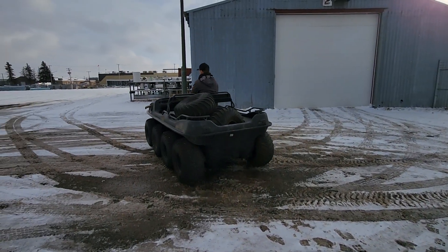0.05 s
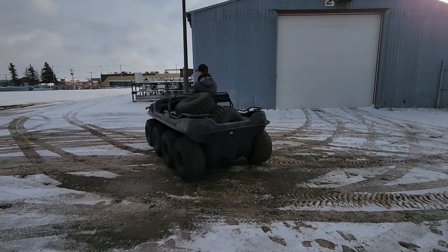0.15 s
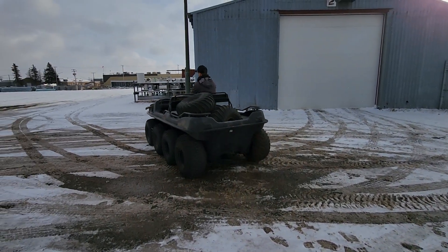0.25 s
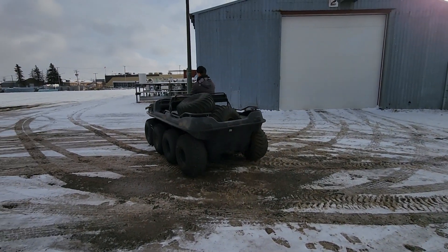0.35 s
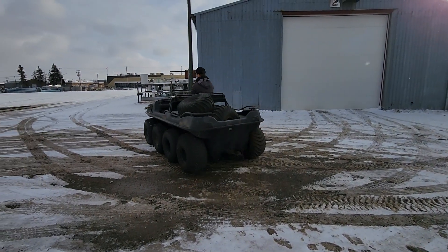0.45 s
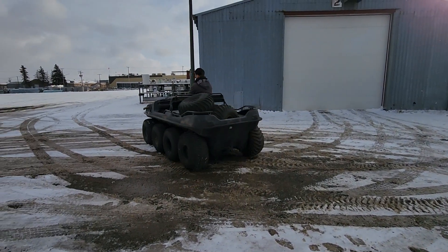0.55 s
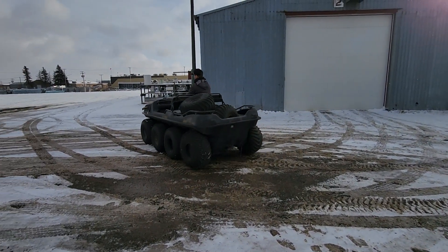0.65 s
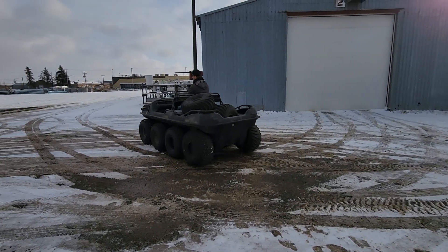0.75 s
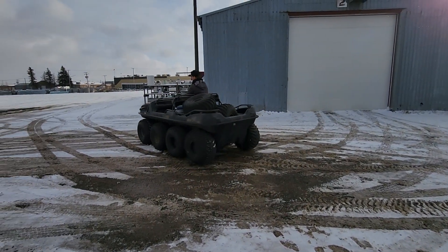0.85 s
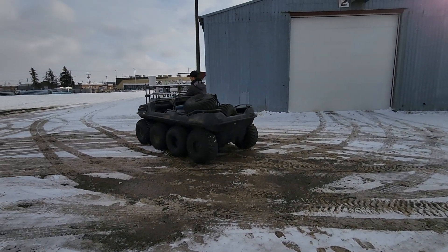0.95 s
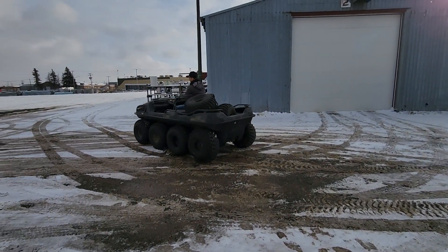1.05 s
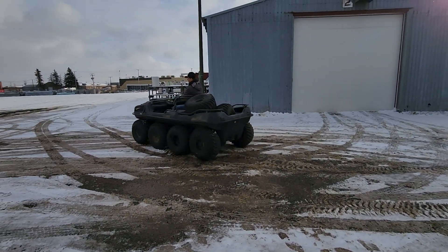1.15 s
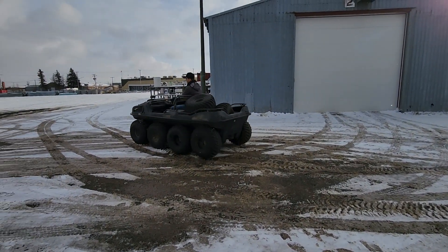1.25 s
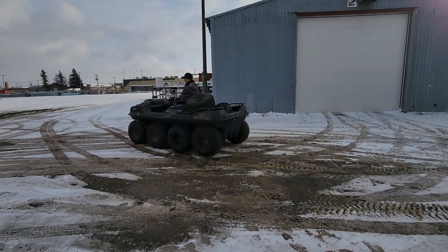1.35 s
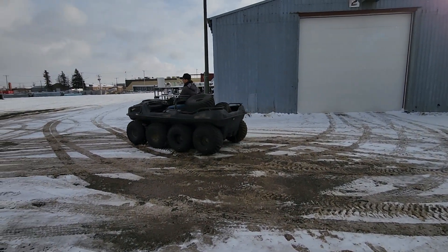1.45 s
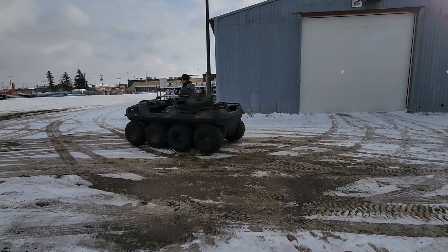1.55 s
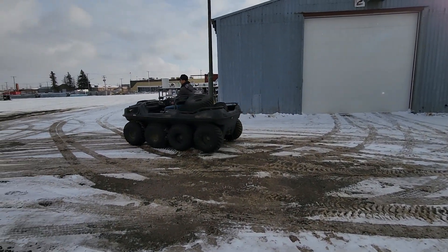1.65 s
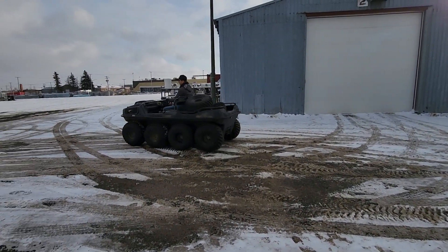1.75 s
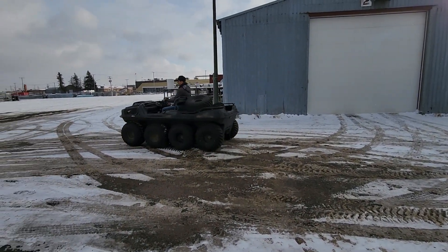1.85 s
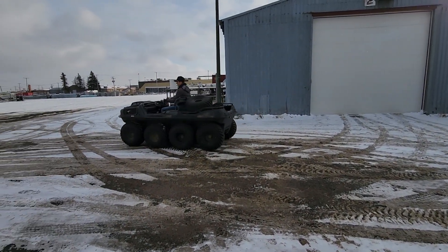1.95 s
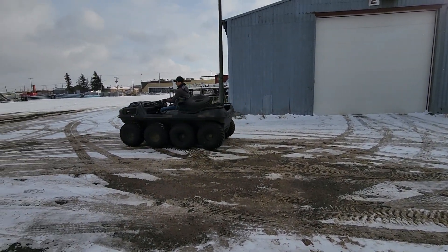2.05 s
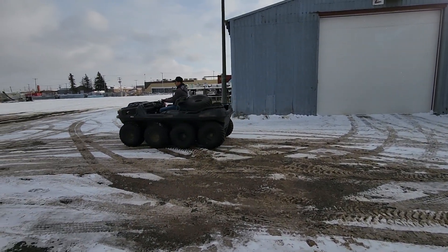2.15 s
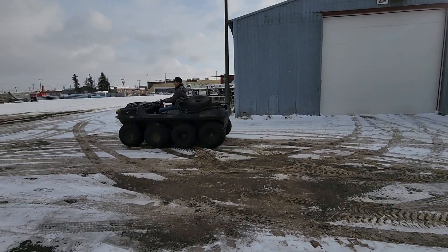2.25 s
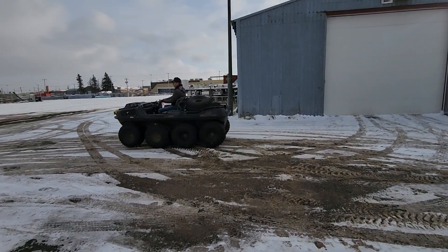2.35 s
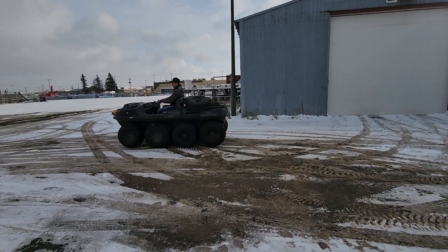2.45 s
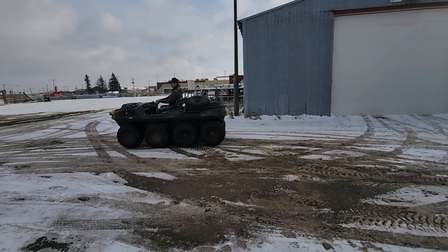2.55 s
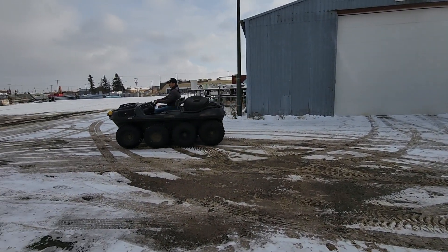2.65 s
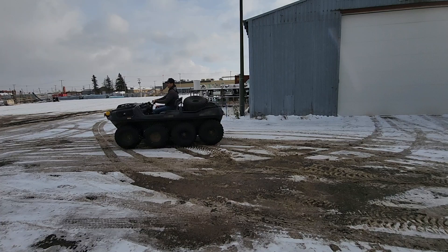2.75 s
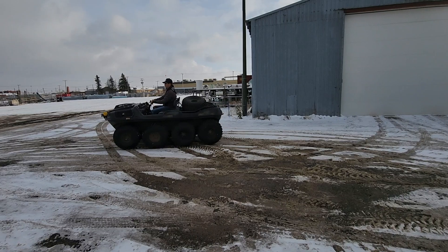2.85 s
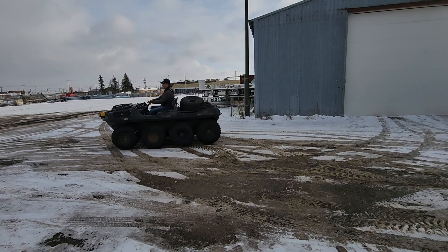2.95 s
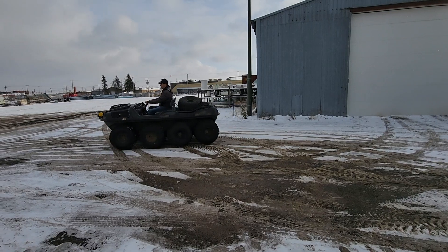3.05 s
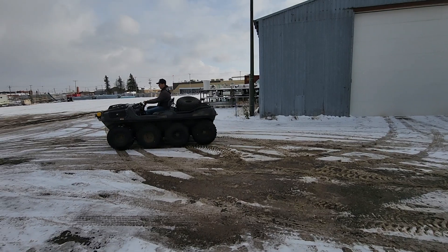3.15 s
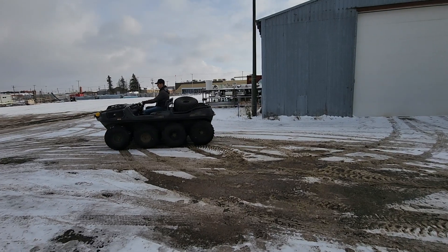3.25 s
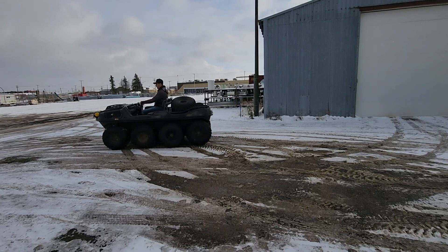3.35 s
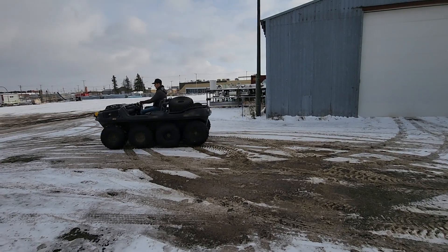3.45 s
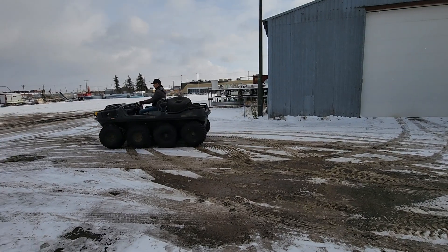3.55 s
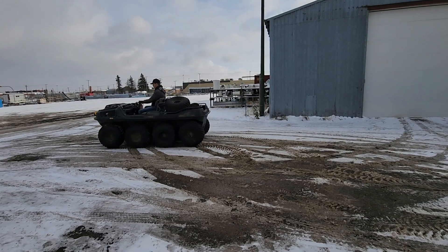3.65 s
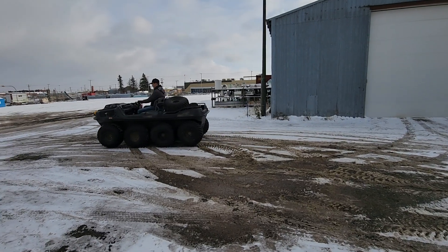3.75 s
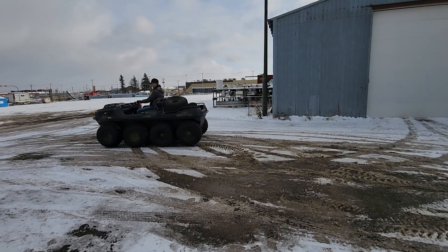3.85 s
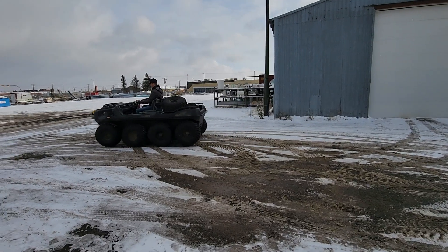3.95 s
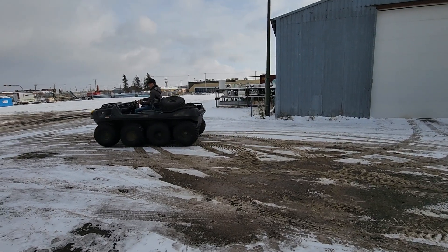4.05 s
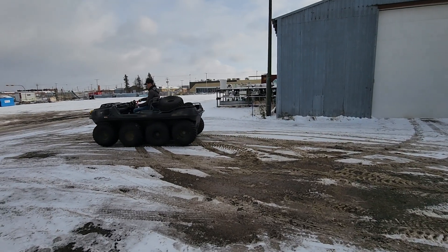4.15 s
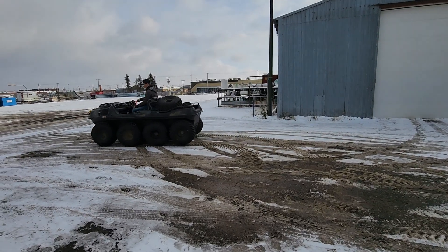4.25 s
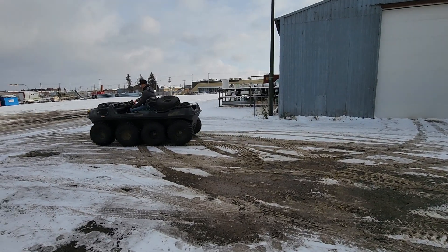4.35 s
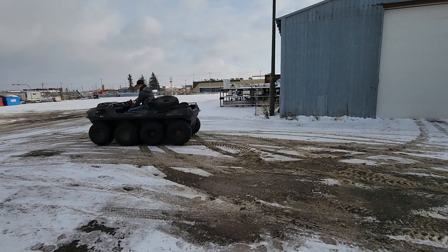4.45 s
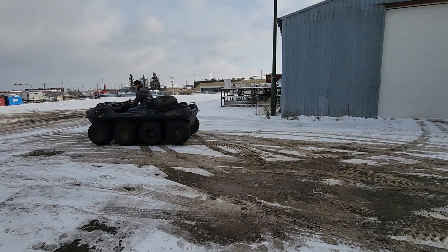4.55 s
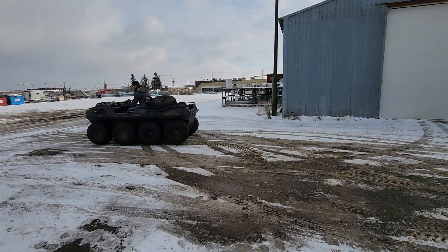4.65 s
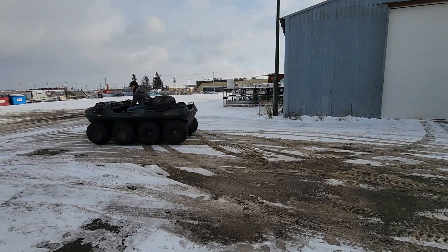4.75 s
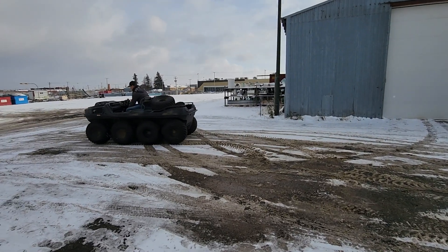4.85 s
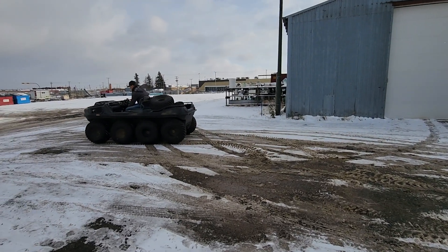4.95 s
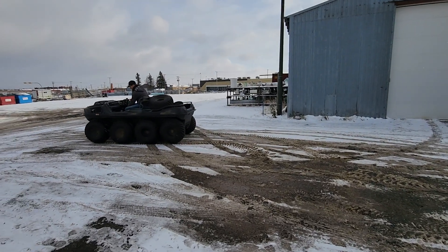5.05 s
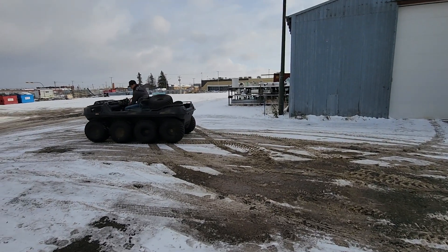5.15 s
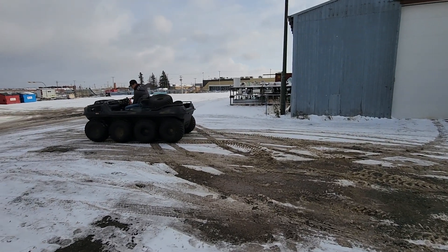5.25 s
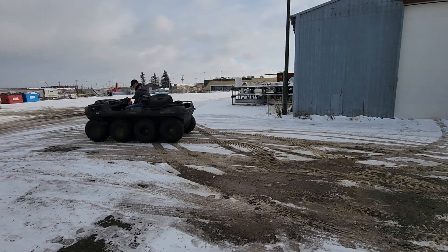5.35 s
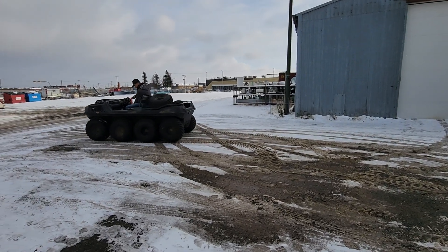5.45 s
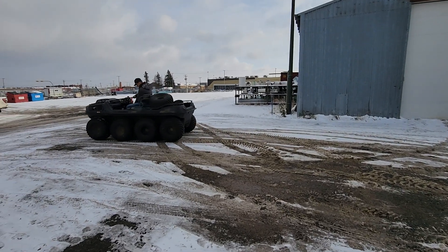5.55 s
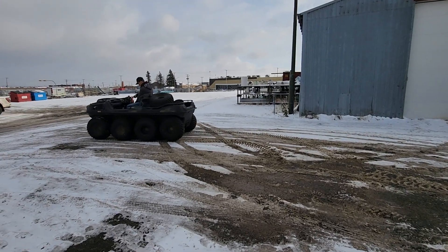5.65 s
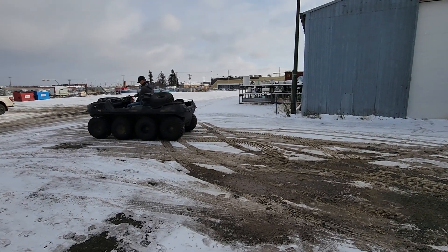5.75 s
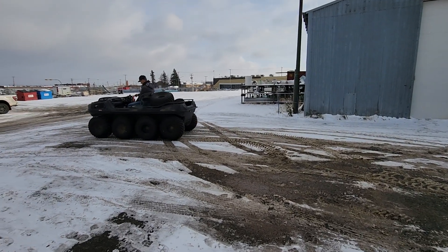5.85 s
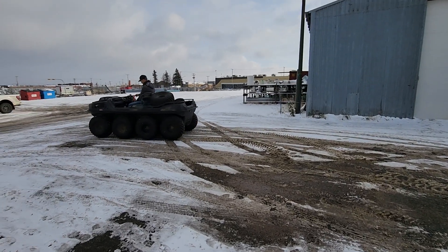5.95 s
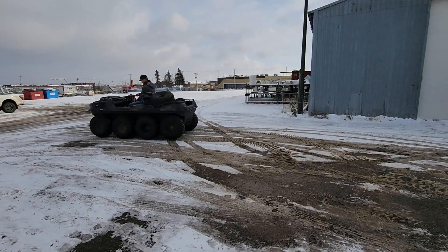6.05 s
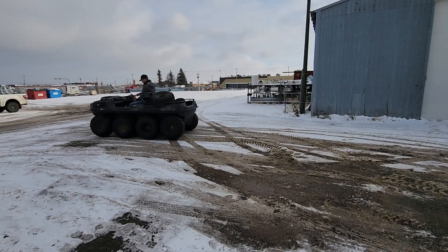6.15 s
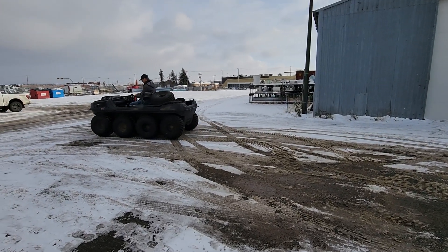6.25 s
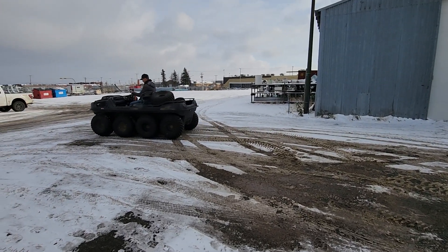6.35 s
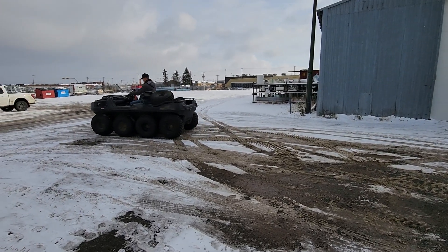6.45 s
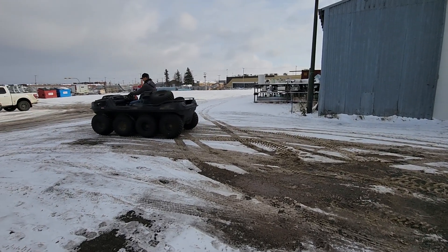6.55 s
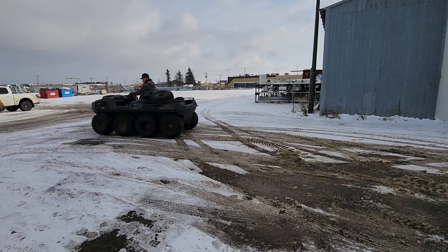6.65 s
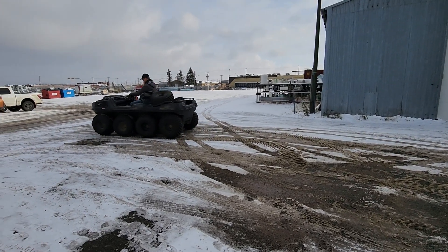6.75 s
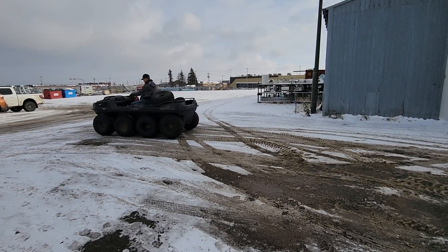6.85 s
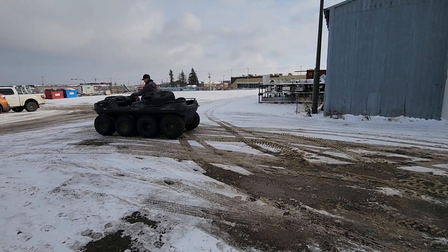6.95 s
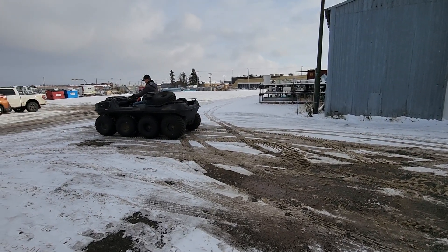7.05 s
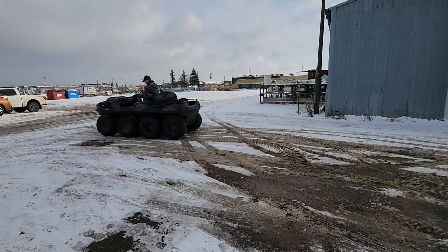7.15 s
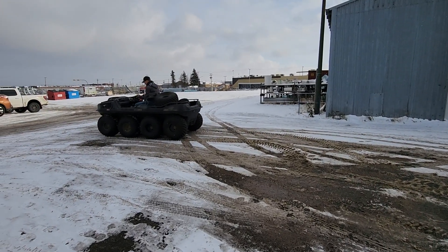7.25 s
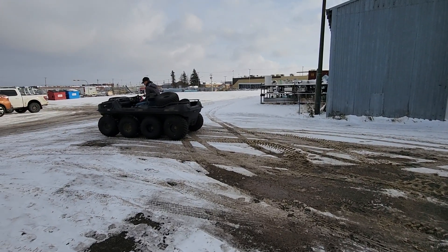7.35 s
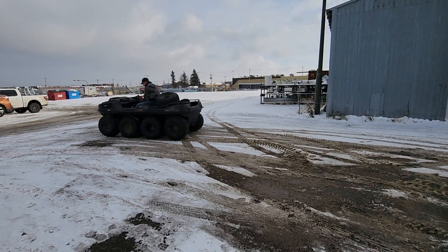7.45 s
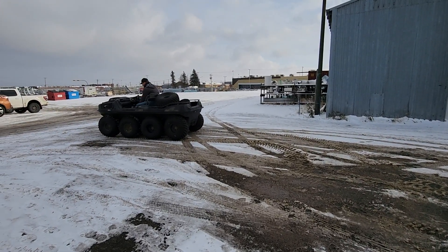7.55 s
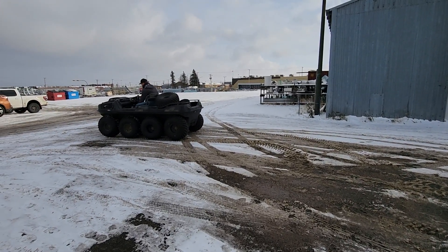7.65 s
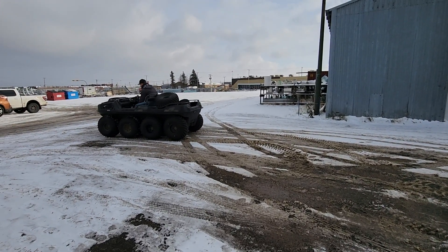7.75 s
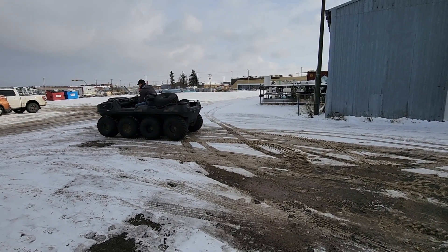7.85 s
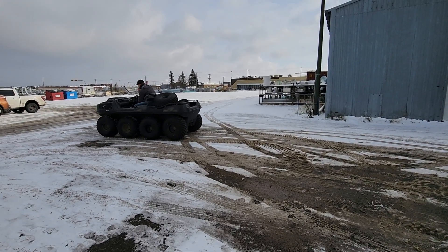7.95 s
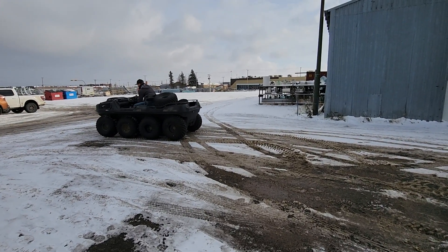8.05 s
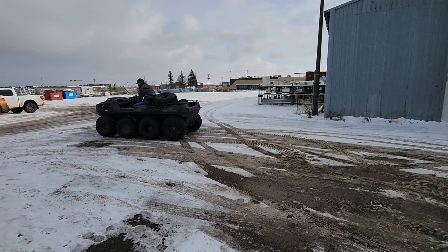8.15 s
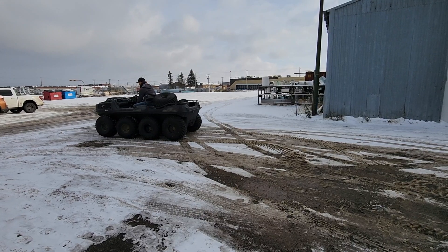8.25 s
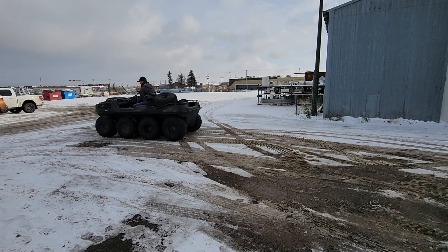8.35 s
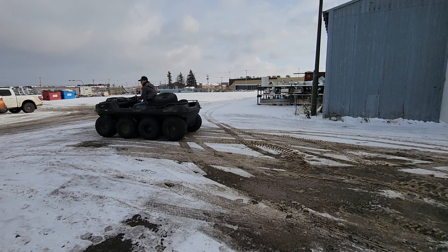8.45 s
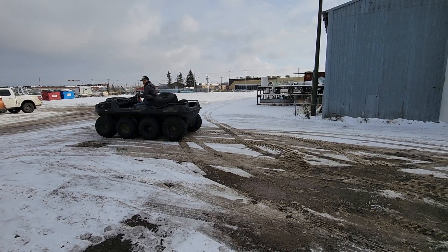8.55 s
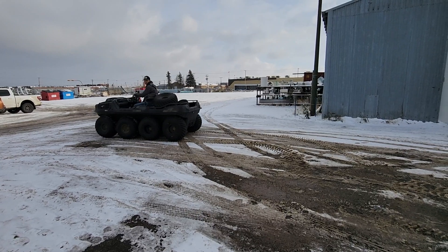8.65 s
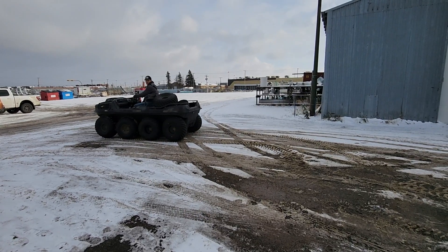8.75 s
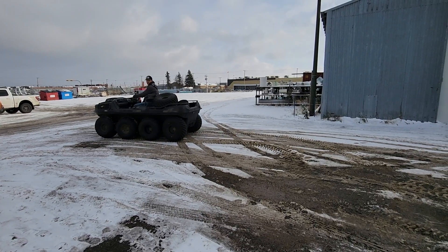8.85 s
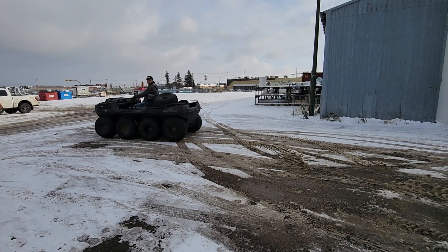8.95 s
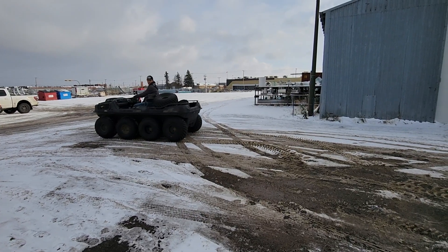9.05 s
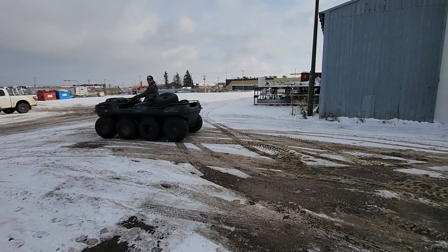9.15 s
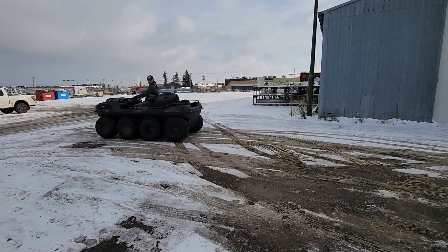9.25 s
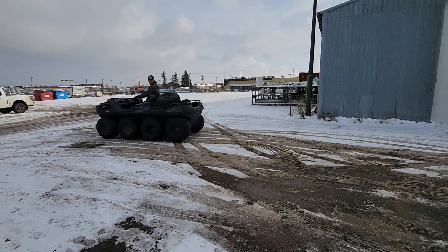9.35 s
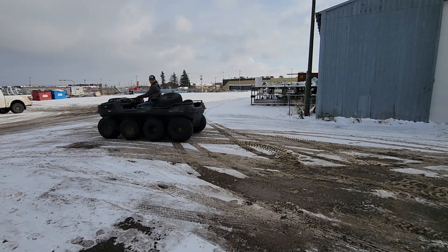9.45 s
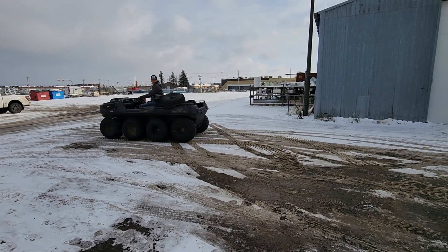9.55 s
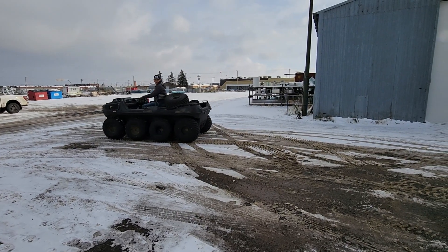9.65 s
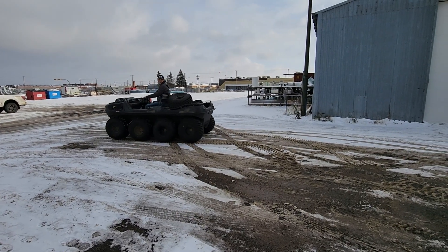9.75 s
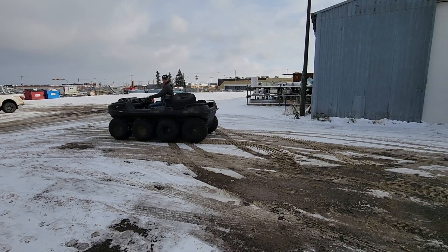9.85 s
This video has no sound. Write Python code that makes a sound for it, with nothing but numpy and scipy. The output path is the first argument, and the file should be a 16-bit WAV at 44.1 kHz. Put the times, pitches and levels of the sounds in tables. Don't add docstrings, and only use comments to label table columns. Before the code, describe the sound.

A rough engine growls at steady speed while wheels crush icy lumps, spray grit and make the hollow hull knock. A short surge, then the revs fall into a slow, lopsided chug with airy, faintly whistling puffs from the tailpipe. Crunching fades to scattered pops before a final quick rev. Open yard, faint far machine hum, handheld stereo microphone at moderate distance.

```python
import sys
import numpy as np
from scipy import signal
from scipy.fft import rfft, irfft, next_fast_len
from scipy.io import wavfile
from scipy.ndimage import uniform_filter1d, map_coordinates

SR = 44100
rng = np.random.default_rng(int(sys.argv[2]) if len(sys.argv) > 2 else 0)


def field_ratio(decibels):
    return 10 ** (np.asarray(decibels, dtype=float) / 20)


def put_to_file(sound):
    columns = np.atleast_2d(sound).T
    safe = np.clip(columns, -1, 1)
    whole_steps = np.round(safe * 32767)
    wavfile.write(sys.argv[1], SR, whole_steps.astype(np.int16))


N = 436149


def unit(x):
    return x / np.sqrt(np.mean(x ** 2) + 1e-20)


def along(points, hz):
    f, v = np.transpose(points)
    return np.interp(np.log(hz + 1), np.log(f + 1), v)


def curves(rows):
    s, *columns = np.transpose(rows)
    return [np.interp(np.arange(N) / SR, s, column) for column in columns]


def wobble(rate):
    return map_coordinates(rng.standard_normal(400), [np.arange(N) * rate / SR], mode="wrap")


def bell(s, length):
    return np.exp(-((np.arange(N) / SR - s) / length) ** 2)


def bells(rows):
    return sum(db * bell(s, length) for s, db, length in rows)


def swells(rows):
    return sum(field_ratio(db) * bell(s, length) for s, db, length in rows)


def filtered(x, response):
    m = next_fast_len(N + SR // 2)
    return irfft(rfft(x, m) * response(np.fft.rfftfreq(m, 1 / SR)), m)[..., :N]


def modes(rows, lowest=1):
    def response(f):
        total = 0
        for k, (centre, width, db) in enumerate(rows):
            sign = lowest if k == 0 else 1
            total = total + sign * field_ratio(db) * 1j * f * width / (centre ** 2 - f * f + 1j * f * width)
        return total
    return response


def noise(patchy_db):
    z = signal.stft(rng.standard_normal((2, N)), nperseg=512)[2]
    field = uniform_filter1d(rng.standard_normal(z.shape[1:]), size=5, axis=0)
    field = uniform_filter1d(field, size=6, axis=1)
    return signal.istft(z * field_ratio(patchy_db * unit(field)), nperseg=512)[1][:, :N]


# (frequency [Hz], coherence [0-1])
COHERENCE = [(60, .99), (200, .97), (380, .86), (600, .94), (1000, .75), (2000, .55), (5000, .5),
             (9000, .35), (15000, .4)]


def spread(pair, response):
    def mid_side(hz):
        turn = np.arccos(np.clip(along(COHERENCE, hz), 0, 1)) / 2
        return response(hz) * np.array([np.cos(turn), np.sin(turn)])
    mid, side = filtered(pair, mid_side)
    return unit(np.array([mid + side, mid - side]))


def steady(x, seconds):
    power = uniform_filter1d(np.mean(np.atleast_2d(x) ** 2, 0), int(seconds * SR))
    return x / np.sqrt(np.abs(power) + 1e-12)


# (time [s], pitch [Hz], level [dB])
FAR_HUM = [(0, 51.6, -35), (2.8, 51.4, -34), (3.8, 50.4, -33.5), (8.95, 50.4, -34), (9.15, 50.4, -42),
           (9.89, 50.4, -43)]
# (frequency [Hz], density [dB per Hz])
RUMBLE_SPECTRUM = [(12, -54), (25, -29.5), (40, -34.5), (60, -2), (100, 4.5), (160, -12.5), (220, -14),
                   (330, -17), (480, -32), (780, -79), (1300, -120)]
# (frequency [Hz], density [dB per Hz])
AIR_SPECTRUM = [(1470, -35), (2500, -16), (6500, 19), (8400, -53), (12400, -21), (16000, -2)]


def yard():
    hz, level_db = curves(FAR_HUM)
    level = field_ratio(level_db + 3 + 1.6 * wobble(3))
    hum = level * np.sin(2 * np.pi * np.cumsum(hz + .2 * wobble(4)) / SR)
    t = np.arange(N) / SR - 5.48
    boom = field_ratio(-25.0) * np.exp(-(t / 0.0713) ** 2) * np.sin(2 * np.pi * 75 * t)
    rumble = field_ratio(-35.5 + 1.5 * wobble(5)) * spread(noise(patchy_db=1.5), lambda f: field_ratio(along(RUMBLE_SPECTRUM, f)))
    air = field_ratio(-61.0) * spread(noise(patchy_db=1.2), lambda f: field_ratio(along(AIR_SPECTRUM, f)))
    return hum + boom + rumble + air


# (time [s], level [dB], length [s])
SLIDES = [(.7, -39, 0.1569), (4.55, -49.5, -0.3606), (5.24, -44.5, 0.0719), (6.45, -46, 0.6337)]
# (frequency [Hz], width [Hz], level [dB])
SNOW_MODES = [(5000.3, 1157, -2), (2755.4, 1638, -5)]
# (time [s], level [dB], length [s], centre [Hz], width [Hz])
GRIT = [(0.10136, -34, 0.1885, 2358.4, 619), (.8, -38.5, 0.1671, 12969, 4330),
        (0.7553, -33, 0.5154, 2447.4, 1010.7)]


def slides():
    out = swells(SLIDES) * spread(noise(patchy_db=1.5), lambda f: modes(SNOW_MODES)(f) / (1 + (f / 7500) ** 4))
    for s, db, length, centre, width in GRIT:
        spray = spread(noise(patchy_db=7.5), lambda f: modes([(centre, width, 0)])(f) ** 2)
        out = out + swells([(s, db, length)]) * spray
    return out


# (time [s], level [dB])
GROUND_SPEED = [(0, -27), (.4, -21.5), (.7, -22.5), (1.3, -23.5), (1.75, -27.5), (2.1, -26), (2.85, -24),
                (3.05, -34.5), (3.18, -25.5), (3.7, -34.5), (4.5, -40), (6.1, -39), (6.9, -46.5),
                (9.2, -46), (9.4, -36.5), (9.89, -30.5)]
# (time [s], level over the rolling [dB], length [s])
LUMPS = [(0.158, 3.5, 0.023), (0.225, -6.5, 0.0699), (.5, -1.5, 0.125), (1.03, 3, 0.0575),
         (2.13, -1, 0.062), (2.302, 8, 0.00694), (2.52, -1.5, 0.202), (4.02, 5, 0.0373),
         (4.124, 8.5, 0.02361), (4.214, 5.5, 0.02393), (4.569, 3.5, 0.0324), (4.675, 5.5, 0.01473),
         (4.772, 1.5, 0.0233), (4.909, -3, 0.0582), (5.131, 3.5, 0.04276), (6.64, 9.5, 0.02045),
         (6.831, 4.5, 0.0378), (7.943, 15, 0.01643), (8.019, 13.5, 0.03518), (8.63, 10.5, 0.0225),
         (9.328, 13, 0.06152), (9.456, 7, 0.0541)]


def rolling():
    return curves(GROUND_SPEED)[0] + 0.8312 * wobble(9) + bells(LUMPS)


# (frequency [Hz], density [dB per Hz])
CRUNCH_SPECTRUM = [(60, -16), (180, 7), (300, -1.5), (371, -5), (554, 1.5), (871, -1), (1120, -9),
                   (1350, -1), (1850, -10.5), (2200, -6.5), (2860, -20.5), (4120, -23), (5160, -24),
                   (6000, -17.5), (7800, -41.5), (13200, -120)]
# (frequency [Hz], width [Hz], level [dB])
HULL_MODES = [(465, 8.406, -6), (558.55, 42.25, 0), (655.9, 85, -3.5), (846, 29.92, -5),
              (1375.5, 53.63, -5)]


def tyres():
    level_db = rolling()
    struck = rng.random(N) < 900 / SR
    grains = struck * field_ratio(3.882 * rng.exponential(size=N)) * field_ratio(7.092 * wobble(14))
    grains = unit(np.minimum(grains, 7)) * rng.standard_normal((2, N))
    bed = spread(0.6064 * grains + noise(patchy_db=2.5),
                 lambda f: field_ratio(along(CRUNCH_SPECTRUM, f)) * (1 + modes(HULL_MODES)(f)))
    return field_ratio(level_db - 0.5) * steady(bed, 0.08976)


# (time [s], peak level [dB], centre [Hz])
SNAPS = [(0.14, -9.5, 2395), (.179, -13.5, 789.3), (.319, -19.5, 665), (.336, -12, 670), (.451, -13, 860),
         (.606, -12.5, 633.2), (.657, -11.5, 849), (.693, -19, 735.5), (.744, -13.5, 467.3),
         (.762, -15, 465), (.998, -11.5, 593), (1.1, -21, 662), (1.126, -15.5, 653), (1.224, -6.5, 690),
         (1.254, -11, 1405), (1.311, -20, 756.5), (1.35, -19, 599.3), (1.407, -13.5, 549.2),
         (1.418, -20.5, 1500), (1.497, -18.5, 529), (1.531, -27, 575.6), (1.562, -17.5, 764),
         (1.635, -14.5, 651.4), (1.686, -14, 643.1), (1.944, -17, 541), (1.98, -16.5, 645.6),
         (2.026, -16.5, 675), (2.145, -11, 698.8), (2.187, -19.5, 653.8), (2.343, -28.5, 544),
         (2.446, -25, 536.4), (2.538, -28, 600), (2.702, -20, 646.5), (2.854, -19, 837), (3.558, -12, 1254),
         (4.084, -19, 690), (6.203, -28, 699.7), (7.93, -33, 700.5), (8.009, -22.5, 922),
         (8.022, -23.5, 830.2), (8.61, -28, 890), (8.629, -30, 654), (8.854, -27.5, 600),
         (9.098, -24, 569.3), (9.349, -15.5, 678.5), (9.83, -17.5, 678)]
# (time [s], peak level [dB], centre [Hz])
CRACKS = [(5.896, -23, 1300), (5.898, -20, 1100), (5.902, -23, 1300), (5.983, -19, 1250),
          (6.001, -20, 1200), (6.0186, -17, 2800), (6.0845, -18, 1000), (6.0925, -19, 2300),
          (6.098, -10.5, 1050), (6.0985, -20, 3000)]


def snaps():
    out, t = np.zeros((2, N + SR)), np.arange(SR // 30) / SR
    for rows, cycles, ahead in ((SNAPS, 9.223, 0), (CRACKS, 2.2, 7)):
        for (s, db, hz), grain in zip(rows, rng.standard_normal((len(rows), len(t)))):
            burst = 0.523 * 0.175 * grain * field_ratio(-60 * t / 0.00342) + (t == 0)
            ring = np.sin(2 * np.pi * hz * t) * field_ratio(-60 * t * hz / cycles)
            knock = np.convolve(burst, ring)[:len(t)]
            knock = field_ratio(db) * knock / np.abs(knock).max()
            for port, way in enumerate((-1, 1)):
                out[port, round(s * SR) + way * ahead:][:len(t)] += knock
    return out[:, :N]


# (frequency [Hz], density [dB per Hz])
FAN_SPECTRUM = [(4000, -60), (7500, -10), (10000, -5), (12500, -2), (16000, 0)]


def fan(revs):
    return field_ratio(-59.5 + 8 * revs) * spread(noise(patchy_db=1.2), lambda f: field_ratio(along(FAN_SPECTRUM, f)))


# (frequency [Hz], width [Hz], level [dB])
BAY_MODES = [(306.48, 125.07, 4), (690, 54.3, 0), (858.28, 276.6, 3.5), (1266.7, 92.2, 8),
             (1522.1, 94.67, 11.5), (1646.9, 44.66, 14.5), (2208.6, 33.7, 10), (3049.5, 640.8, -2.5)]
# (time [s], level over the bay [dB], length [s])
JABS = [(9.0, -2.265, -0.7043), (9.18, -3.36, 0.0577)]
# (frequency [Hz], width [Hz], level [dB])
BRACKET_MODES = [(853, 41.48, -0.15), (1647.2, 73.53, 0.43), (319.82, 74.76, -3.444)]


def engine_bay(flow):
    shake = (1 + 0.1584 * flow.sum(0)) * field_ratio(1.0426 * wobble(25))
    panels = spread(noise(patchy_db=1.0848) * shake, lambda f: modes(BAY_MODES)(f) / (1 + (f / 6500) ** 4))
    return steady(panels, 0.738) + swells(JABS) * spread(noise(patchy_db=4.5), modes(BRACKET_MODES))


# (time [s], rate [cycles per second])
REVS = [(0, 19.14), (.89, 19.63), (1, 19.33), (1.71, 19.74), (2.19, 19.32), (2.49, 21.25), (2.91, 20.59),
        (3.18, 18.27), (3.38, 15.36), (4.27, 12.16), (5.14, 11.292), (6.48, 10.99), (6.65, 11.32),
        (8.1, 11.71), (8.93, 11.33), (8.95, 13.23), (9.22, 19.74), (9.9, 16.74)]


def firings():
    rate, = curves(REVS)
    turned = -.39 + np.cumsum(rate) / SR
    marks = (np.arange(int(turned[-1]) + 1)[:, None] + [0, .368]).ravel()
    at = np.searchsorted(turned, marks)
    inside = (at > 0) & (at < N)
    speed = uniform_filter1d(rate, size=6000)
    rise = uniform_filter1d(np.gradient(speed) * SR, size=4000)
    load = np.clip((speed - 12.5) / 6 + 0.01002 * rise, 0, 1)
    idle_rate, full_rate = 11.3, 20
    revs = (speed - idle_rate) / (full_rate - idle_rate)
    return at[inside], (np.arange(len(marks)) % 2)[inside], load, revs


# (time [s], level [dB], length [s])
OVERRUN = [(3.0, -24.5, 0.0864), (3.14, -25.5, 0.1002), (3.3, -23, 0.131)]


def overrun():
    return swells(OVERRUN) * np.sin(2 * np.pi * 3 * np.cumsum(curves(REVS)[0]) / SR)


# (frequency [Hz], width [Hz], level [dB])
PIPE_IDLE = [(36, 12, -9), (54, 13, -5), (100, 37, -19), (129, 13, -13.5), (157, 21, -12), (186, 14, -17)]
# (frequency [Hz], width [Hz], level [dB])
PIPE_LOAD = [(39.53, 4.097, 11.5), (62.03, 23.33, -11.5), (85.98, 14.76, 8.5), (94, 23.98, 5),
             (114.42, 13.63, 4), (132.7, 6.38, -28.5), (155.7, 2.5, -6), (211.66, 24.22, 0.5)]
# (frequency [Hz], width [Hz], level [dB])
PIPE_BEHIND = [(39.12, 8.95, 8.5), (76.7, 9.837, 9), (94.766, 12.29, -2.5), (118.94, 11.13, 3.5),
               (148.07, 9.474, 2.5), (210.7, 23.15, -17.5)]
# (time [s], level over the pipe [dB], length [s])
BUZZING = [(1.8, -8, .45), (2.7, -10, .2), (8.99, -6, .035), (9.7, -13, .06)]
# (frequency [Hz], width [Hz], level [dB])
PANEL_MODE = [(207.68, 27.63, 0)]


def exhaust(at, cylinder, load, turned, luck):
    blows = np.bincount(at + 45, field_ratio(.9 * luck + cylinder * (3 * load[at] - 3)), N + 100)[:N]

    def soft(f, top_hz):
        silencer = -1 / (1 + (1j * f / top_hz) * 1.2 - (f / top_hz) ** 2)
        return silencer * (f / (f - 28j)) ** 2

    def hot(pipe):
        return unit(filtered(blows * load, lambda f: soft(f, top_hz=250) * modes(pipe)(f) / (1 + (f / 260) ** 6)))

    idle = unit(filtered(blows * (1 - load),
                         lambda f: soft(f, top_hz=190) * modes(PIPE_IDLE, -1)(f) / (1 + (f / 205) ** 8)))
    pull = (1 - turned) * hot(PIPE_LOAD) + turned * hot(PIPE_BEHIND)
    buzz = swells(BUZZING) * unit(filtered(blows * load, lambda f: modes(PANEL_MODE)(f) ** 2))
    return steady(idle + 0.4705 * pull, 0.25) + buzz


def pipe_roar(load):
    return load * spread(noise(patchy_db=3.5), modes(PIPE_LOAD + [(69, 60, 19), (302, 360, -14)]))


def puffs(at, cylinder, load, luck):
    t = np.arange(SR // 10) / SR
    size = field_ratio((1.3 - .2 * load[at]) * luck + cylinder * (6 * load[at] - 3))
    kicks = np.array([np.bincount(at, size * (cylinder == k), N) for k in (0, 1)])

    def shape(hold):
        opening = 1 - np.exp(-(t / 0.0035) ** 1.5)
        return (opening * (np.exp(-(t / hold) ** 4) + .12 * np.exp(-t / .02)))[None]

    flow = signal.fftconvolve(kicks * (1 - load), shape(hold=0.0205))
    flow = flow + signal.fftconvolve(kicks * load, shape(hold=0.012))
    return np.abs(flow[:, :N])


# (time [s], level [dB], length [s])
COASTING = [(3.4, -8, 0.3534), (4.5, -20, 0.674)]


def leakage(revs):
    return 0.06449 + 0.3133 * np.clip(revs, 0, 1) ** 2 + swells(COASTING)


# (frequency [Hz], density [dB per Hz])
HISS_AHEAD = [(1530, -51), (2600, -21), (3770, 2.5), (4100, -3.5), (5190, -5), (6570, -5), (7260, -6),
              (8640, -5), (11900, -3.5), (16000, -10)]
# (frequency [Hz], width [Hz], level [dB])
SHELLS_AHEAD = [(5103.7, 32.2, 9.9), (5388.5, 87.5, 8.17), (6425.6, 324, 1.49), (7287.9, 81.2, 1.973),
                (7773.2, 179.6, 2.716), (11429, 31.54, 0.7)]


def tailpipe_ahead(gas, flow, leak, turned):
    return spread(gas * (flow.sum(0) + 2 * leak) * np.sqrt(1 - turned),
                  lambda f: field_ratio(along(HISS_AHEAD, f)) * (1 + modes(SHELLS_AHEAD)(f)))


# (frequency [Hz], density [dB per Hz])
HISS_BEHIND = [(1530, -52.5), (2600, -21.5), (3660, -1.5), (3900, -12.5), (4700, -2.5), (5110, -7.5),
               (6670, -7.5), (8450, -11.5), (13700, -8), (16000, -14.5)]
# (frequency [Hz], width [Hz], level [dB])
SHELLS = [
    [(3325.2, 61.4, 14.33), (4182.5, 24.22, 13.43), (4683.5, 46.84, 10.42), (5411, 32, 15.43),
     (6590, 566.4, 4.304), (10446, 43.6, 3.094), (12944, 189.7, 3.73)],
    [(4313.5, 49.2, 8.14), (3551.8, 30.77, 13.72), (5429.5, 317, 4.995), (6450, 1314, 10.024),
     (9099, 31.8, 7.22), (9986, 131.5, 2.393), (12607, 123.4, 1.3)],
]
# (frequency [Hz], width [Hz], level [dB])
SHELLS_SIDE = [(3338.2, 76.2, 24.5), (6549.8, 272.4, -1.5), (7310, 201.5, 8), (12557, 837, 10)]
# (frequency [Hz], width [Hz], level [dB])
SHELLS_HOT = [(4634, 35.74, -5.5), (5265.8, 89.6, 12.5), (5611.5, 95, 16), (6370.3, 174, -2),
              (12665, 346, -10)]


def tailpipe_behind(gas, flow, leak, load, turned):
    def ring(gate, shell):
        return spread(gas * (gate + leak) * np.sqrt(turned),
                      lambda f: field_ratio(along(HISS_BEHIND, f)) * (1 + modes(shell)(f)))
    side = np.clip((0.92 - turned) / 0.0824, 0, 1)
    hot = np.clip(0.691 * load, 0, 1) * turned ** 4
    first = side * ring(flow[0], SHELLS_SIDE) + (1 - side) * ring(flow[0], SHELLS[0])
    cool = 0.6983 * first + 0.5114 * ring(flow[1], SHELLS[1])
    return (1 - hot) * cool + hot * ring(flow.sum(0), SHELLS_HOT)


# (time [s], level over the hiss [dB], length [s])
SINGING = [(.2, -10.5, -1.5421), (.8, -16.5, -0.5964), (1.5, -1.5, 0.3348), (2.08, -15, 1.52),
           (2.72, -7.5, -0.0026)]
# (frequency [Hz], width [Hz], level [dB])
SHIELD_MODES = [(5085.3, 78.9, 0), (7085.8, 87.6, -6.5)]


def heat_shield(gas, flow):
    return swells(SINGING) * spread(gas * flow.sum(0), modes(SHIELD_MODES))


# (cylinder [0-1], start [Hz], rise [Hz], scatter [Hz])
WHISTLES = [(0, 4480, 260, 70), (0, 3240, 70, 35), (1, 3530, 70, 30), (1, 4780, 40, 60)]
# (time [s], then four levels over the hiss [dB])
WHISTLING = [(0, -40, -40, -40, -40), (3.7, -39.5, -30, -40, -40), (4.0, -30, -5, -30, -31.5),
             (4.6, -24, -7, -25, -25), (5.1, -34.5, -22, -19.5, -27), (5.9, -10.5, -14, -21.5, -10),
             (6.3, -6.5, -17.5, -7, -22.5), (8.0, -15, -17, -8, -18), (8.85, -8, -14.5, -18.5, -15),
             (8.95, -39.5, -39.5, -39.5, -42.5), (9.89, -40, -40, -40, -40)]


def whistles(at, cylinder):
    t = np.arange(SR // 25) / SR
    length_s, scatter_db = .012, 2.2
    envelope = (t / length_s) * np.exp(1 - (t / length_s) ** 1.6)
    out = np.zeros((len(WHISTLES), N + SR))
    for row, (k, hz, rise_hz, scatter_hz) in zip(out, WHISTLES):
        for start, (pitch, size) in zip(at[cylinder == k], rng.standard_normal((len(at), 2))):
            glide = hz + scatter_hz * pitch + rise_hz * (1 - np.exp(-t / length_s))
            tone = np.sin(2 * np.pi * np.cumsum(glide) / SR)
            row[start:][:len(t)] += field_ratio(scatter_db * size) * envelope * tone
    mix = sum(field_ratio(db) * unit(row[:N]) for db, row in zip(curves(WHISTLING), out))
    return field_ratio(2.33 * wobble(180)) * mix


# (frequency [Hz], density [dB per Hz])
SPIT_SPECTRUM = [(3000, -42), (6000, -16), (8300, -6.5), (10000, -1.5), (12800, 3.5), (16000, -4)]
# (time [s], level over the hiss [dB])
SPITTING = [(0, -10), (1.2, -4), (2.5, -4), (2.88, -6), (3, -16), (3.9, -8), (4.3, -3), (5.4, -3),
            (6.2, -8), (8.88, -8), (8.95, -5), (9.3, -8), (9.89, -11)]
# (time [s], extra level [dB], length [s])
HARD_SPITS = [(3.338, 10.5, 0.0121), (3.56, 12, 0.01217), (4.276, 3.5, 0.0119), (4.472, 9, 0.01206),
              (4.526, 6, 0.01194), (4.693, 7, 0.0119), (4.896, 5.5, 0.01198), (4.951, 4, 0.01196),
              (5.216, 3.5, 0.01191), (5.307, 5, 0.01203), (5.93, 6, 0.01204), (7.18, 6, .012),
              (7.527, 4, 0.01202), (7.958, 5, 0.01194), (8.472, 5.5, .012), (8.908, 0.5, 0.01183),
              (8.941, 5.5, 0.0118), (9.014, 5.5, 0.01177), (9.138, 3.5, 0.01182)]


def spits(at, cylinder, load, luck):
    t = np.arange(SR // 50) / SR
    kicks = np.bincount(at, field_ratio(2.8 * luck + cylinder * (4 * load[at] - 4)), N)
    decay = (1 - np.exp(-t / .0006)) * np.exp(-t / .003)
    gate = np.abs(signal.fftconvolve(kicks, decay)[:N])
    bright = spread(gate * rng.standard_normal((2, N)), lambda f: field_ratio(along(SPIT_SPECTRUM, f)))
    return field_ratio(curves(SPITTING)[0] + bells(HARD_SPITS)) * steady(bright, .4)


# (time [s], turn [0-1])
HEADING = [(0, 0), (2.85, 0), (3.0, .6), (5.8, 1), (9.89, 1)]
# (time [s], opening [0-1])
THROTTLE = [(0, 0.43), (.3, 0.61), (.82, 0.59), (.98, 0.47), (1.3, 0.57), (2.2, 0.56), (2.35, 0.89),
            (2.62, 0.45), (2.8, 0.56), (3.3, 0.18), (4.3, 0.17), (5.4, 0.36), (8.885, 0.41), (8.915, 0.87),
            (9.2, 0.99), (9.36, 0.6), (9.68, 0.7), (9.83, 0.13)]
# (time [s], level over the thump [dB], length [s])
BARKS = [(.32, 3, 0.122), (1.25, 2, 0.1064), (2.42, 4, 0.1544), (2.8, 2, 0.0704), (3.12, -2.5, 0.1424),
         (9.0, 2.5, 0.04186), (9.07, 1.5, 0.0708), (9.32, -1, 0.0836), (9.6, -2, 0.2438)]


def engine():
    turned = np.clip(curves(HEADING)[0], 0, 1)
    throttle, = curves(THROTTLE)
    at, cylinder, load, revs = firings()
    load = np.maximum(load, np.clip((throttle - .47) / 0.6403, 0, 1))

    def level(shut_db, revs_db, open_db, sway_db):
        return shut_db + revs_db * revs + open_db * throttle + sway_db * wobble(5)

    thump_db = level(-34.5, 5.5, 9.5, 2)
    hiss_db = level(-55, 0.0577, 26.5, -2.2157)
    bay_db = level(-46, 7.5, 4.5, 1.5)

    luck = rng.standard_normal((len(at), 2))
    thump = field_ratio(thump_db + bells(BARKS)) * exhaust(at, cylinder, load, turned, luck[:, 0])
    roar = field_ratio(thump_db - 12) * pipe_roar(load)
    flow = puffs(at, cylinder, load, luck[:, 1])
    gas, leak = noise(patchy_db=4.0), leakage(revs)
    jet = tailpipe_ahead(gas, flow, leak, turned) + tailpipe_behind(gas, flow, leak, load, turned)
    hiss = steady(jet, 0.46165) + whistles(at, cylinder) + heat_shield(gas, flow)
    hiss = hiss + spits(at, cylinder, load, luck[:, 1])
    bay = field_ratio(bay_db + 1.5 - 0.2978 * load) * engine_bay(flow)
    return fan(revs) + thump + roar + overrun() + field_ratio(hiss_db + 2.5) * hiss + bay


# (time [s], slip of each port toward the other [samples], left over right [dB])
BEARING = [(0, 4.5, .8), (1.2, 3.6, .2), (1.7, 1, .4), (3.4, .8, .2), (4.5, 0, 0), (5.3, -.3, .7),
           (6.8, -.4, .4), (8.6, -.2, -.3), (9.89, .4, -.2)]


def scene():
    slip, pan_db = curves(BEARING)
    left, right = yard() + slides() + tyres() + snaps() + engine()

    def port(x, way):
        return field_ratio(way * pan_db / 2) * map_coordinates(x, [np.arange(N) - way * slip], mode="nearest")

    return np.array([port(left, 1), port(right, -1)])


def roll_off(x):
    return signal.sosfilt(signal.butter(12, 16490, fs=SR, output="sos"), x)


# (frequency [Hz], left minus right [dB])
PORT_COLOUR = [(100, -0.5), (700, -2), (1500, -7), (3000, -3.5), (5500, -6.5), (7500, -4), (9000, 10.5),
               (10500, 4), (12300, -4.5), (14000, -3.5), (15500, 10)]
# (frequency [Hz], phase [rad])
PORT_LEAD = [(0, .1), (200, .25), (380, .6), (600, .7), (950, 1.4), (1640, 4.2), (2330, 6.4), (5300, 14.5),
             (16500, 44)]


def record(dry):
    def ports(f):
        half = field_ratio(along(PORT_COLOUR, f) / 2) * np.exp(.5j * np.interp(f, *np.transpose(PORT_LEAD)))
        return np.array([half, 1 / half]) * (f < 15800)
    return roll_off(filtered(dry, ports))


dry = scene()
out = record(dry)
put_to_file(out)
```